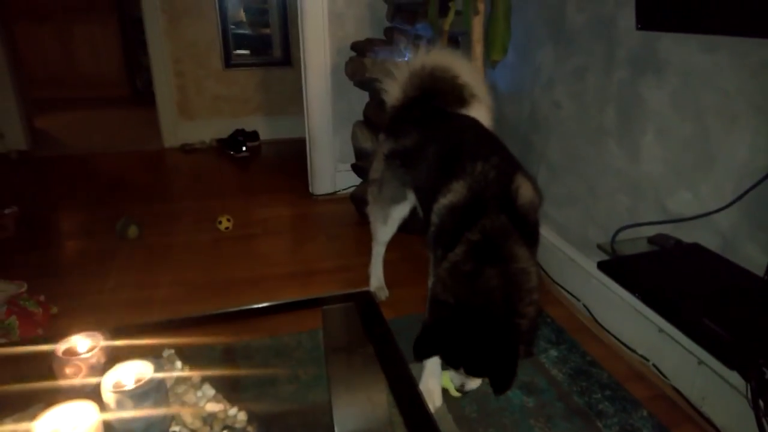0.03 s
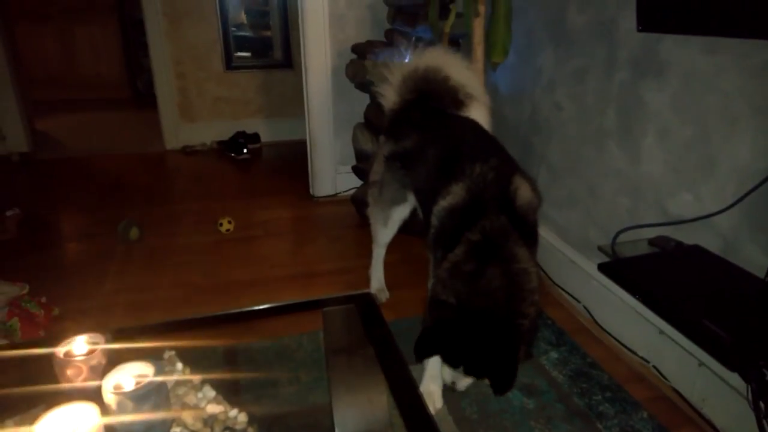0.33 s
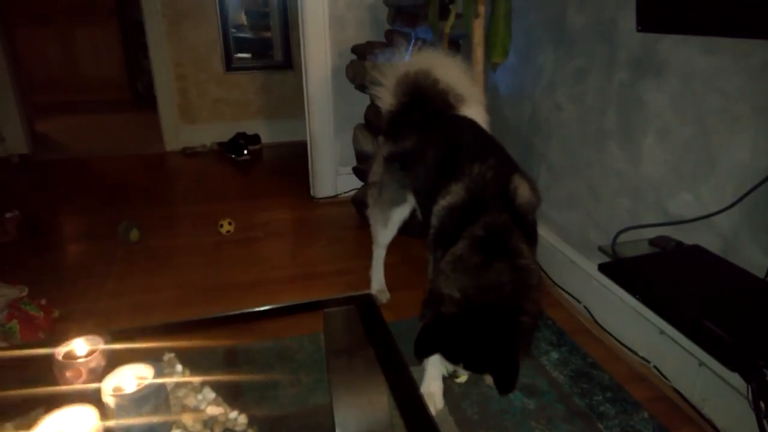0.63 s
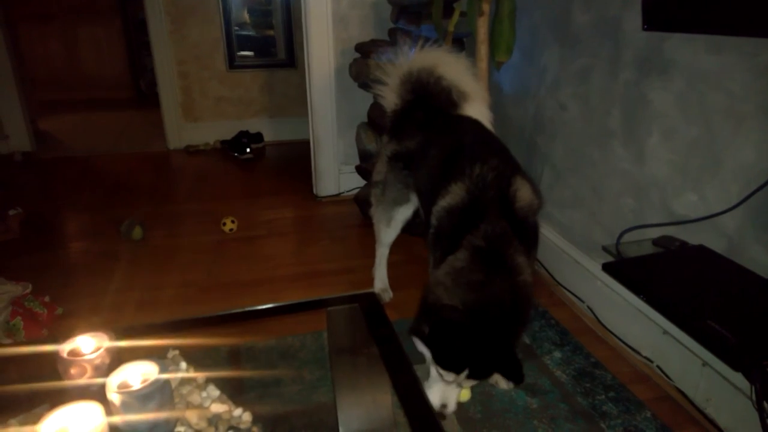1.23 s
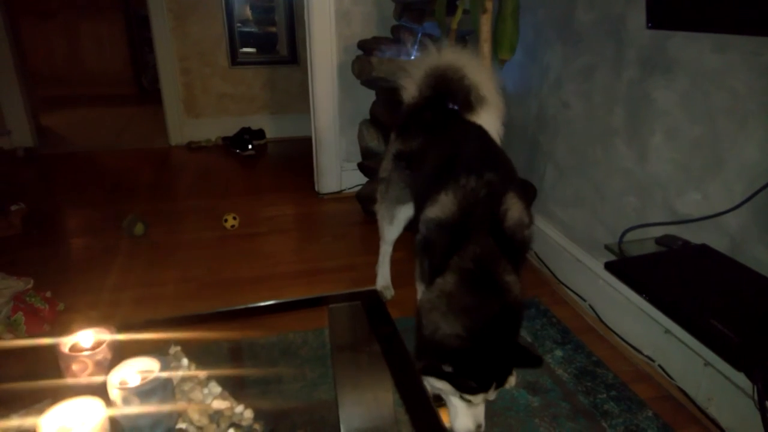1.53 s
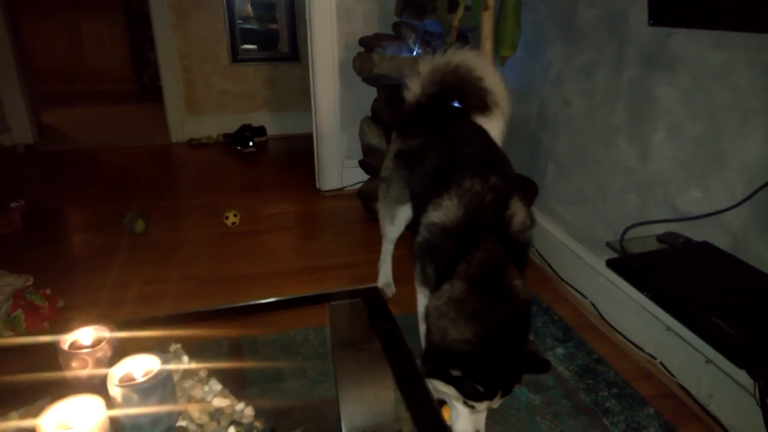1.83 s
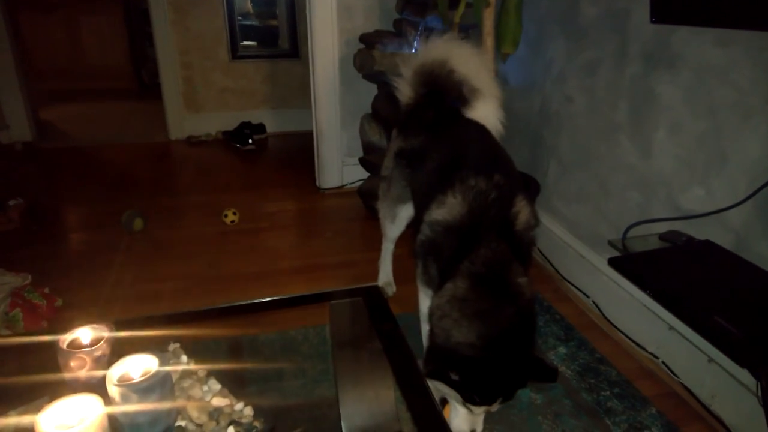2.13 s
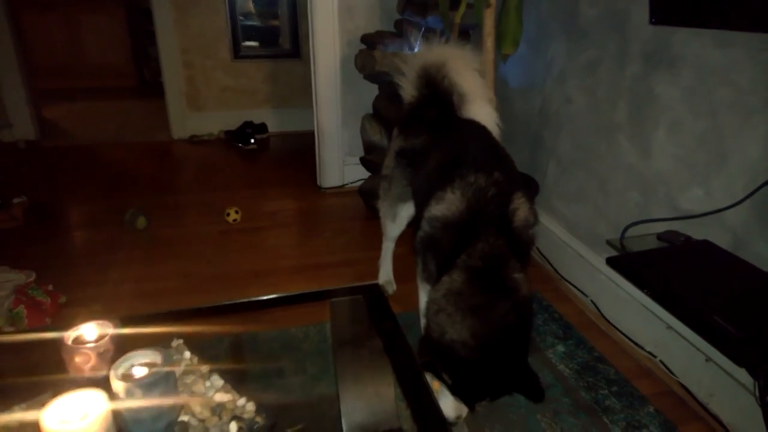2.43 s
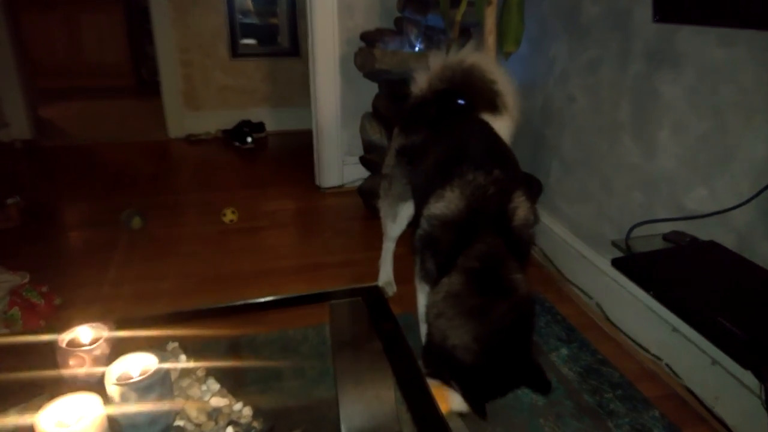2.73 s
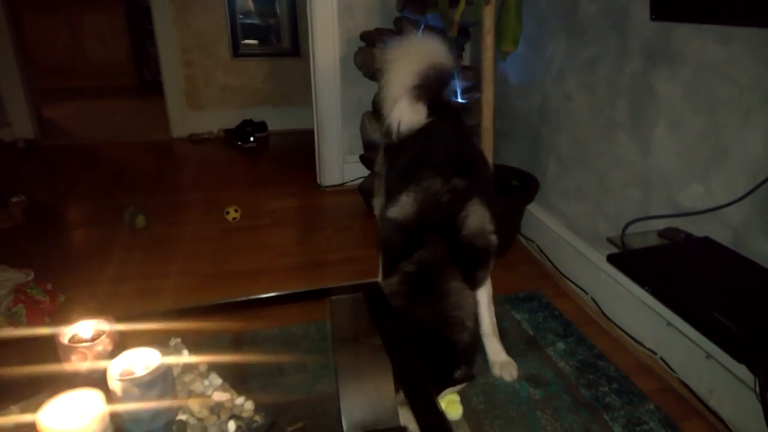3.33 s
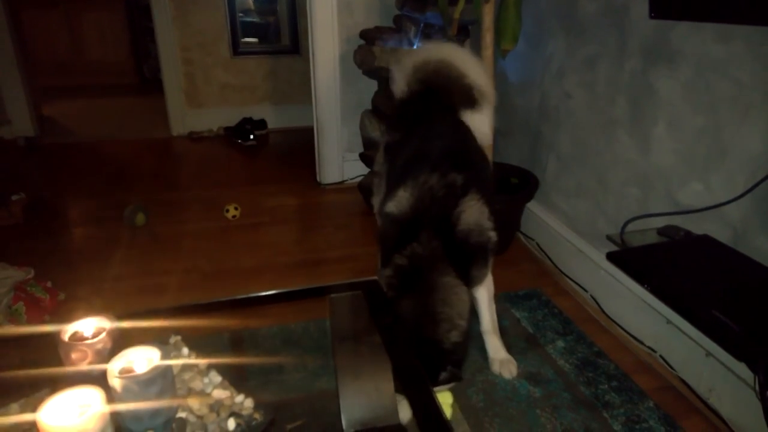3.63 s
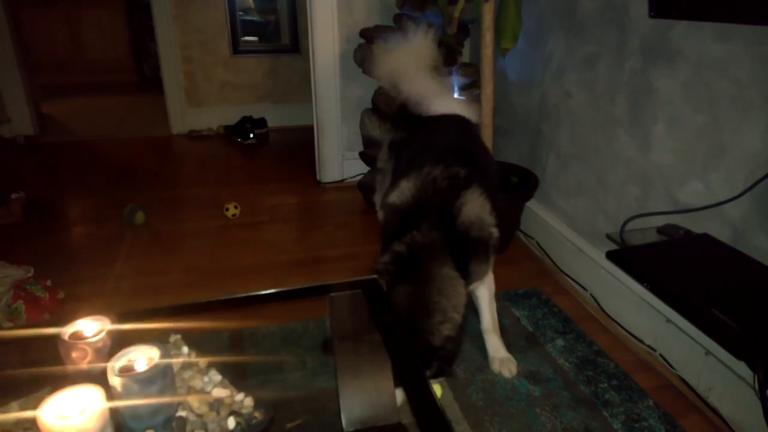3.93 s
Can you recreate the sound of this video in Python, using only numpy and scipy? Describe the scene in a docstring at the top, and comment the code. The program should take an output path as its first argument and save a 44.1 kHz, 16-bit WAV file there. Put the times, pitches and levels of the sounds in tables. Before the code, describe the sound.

A squeaky toy squeals up and down as a dog chews it in a quiet room. A quick run of squeaks gives way to fainter ones, with light ticks, rustling and dull bumps on the microphone.

```python
"""Dog with a squeaky toy

A quiet living room, heard from a camera's two microphones; the dog chews on a rug a little to the
right. Air through the toy's reed squeals up and down with each bite and rasps lower as the toy
refills; the room rings on. Mouth and paws rustle and tick, fingers bump the camera right beside
the microphones, and a soft hiss and hum lie underneath."""
import sys
import numpy as np
from scipy import signal
from scipy.fft import rfft, irfft, next_fast_len
from scipy.io import wavfile
from scipy.ndimage import uniform_filter1d, map_coordinates

SR = 44100
rng = np.random.default_rng(int(sys.argv[2]) if len(sys.argv) > 2 else 0)


def int16_out(signal):
    """Quantize to a 16-bit WAV file."""
    q = np.round(np.clip(np.atleast_2d(signal).T, -1, 1) * 32767)
    wavfile.write(sys.argv[1], SR, q.astype(np.int16))


N = 176400
T = np.arange(N) / SR


def amp(db):
    """Decibels to gain."""
    return 10 ** (np.asarray(db) / 20)


def unit(x):
    """Scale to rms 1."""
    return x / np.sqrt(np.mean(x ** 2) + 1e-20)


def along(points, hz):
    """Read (f/Hz, value) points on a log frequency axis."""
    f, v = np.transpose(points)
    return np.interp(np.log(hz + 1e-6), np.log(f), v)


def wobble(rate):
    """A smooth random curve, rate knots a second."""
    return map_coordinates(rng.standard_normal(8192), [T * rate], mode="wrap")


def filtered(x, response):
    """Filter x by a gain given as a function of frequency."""
    size = next_fast_len(N + SR // 2)
    return irfft(rfft(x, size) * response(np.fft.rfftfreq(size, 1 / SR)), size)[..., :N]


def noise(spectrum):
    """Noise of rms 1, coloured by (f/Hz, level/dB) points."""
    return unit(filtered(rng.standard_normal(N), lambda hz: amp(along(spectrum, hz))))


def swells(rows):
    """Bell-shaped envelopes from (peak t/s, half-width/s, level/dB) rows."""
    return sum(amp(db) * np.exp(-2 * ((T - peak) / width) ** 2) for peak, width, db in rows)


# likeness of diffuse sound at the two microphones: f/Hz, correlation
MIC_LIKENESS = [(30, 0.13), (200, 0.66), (500, 0.89), (1200, 0.35), (2200, 0.05), (5000, 0.051)]
def diffuse(pair):
    """Blend two unrelated signals into sound reaching the microphones from all sides."""
    turn = lambda hz: np.arccos(np.clip(along(MIC_LIKENESS, hz), -1, 1)) / 2
    mid, side = filtered(pair, lambda hz: np.array([np.cos(turn(hz)), np.sin(turn(hz))]))
    return np.array([mid + side, mid - side])


# hiss of the quiet room: f/Hz, level/dB
HISS_SPECTRUM = [(20, -25), (45, 9.5), (95, -1), (170, -2.5), (280, -6), (400, 4.5), (600, -8), (880, -8),
                 (1120, 2.5), (2500, -5.5), (4300, -4.5), (6500, -12), (11500, -23), (15000, -28.5)]
def room_tone(hiss_db=-45, hum_hz=118.2, hum_db=-59.5):
    """Steady hiss all around and a faint mains hum in the centre."""
    hiss = diffuse(np.array([noise(HISS_SPECTRUM), noise(HISS_SPECTRUM)]))
    hum = np.sqrt(2) * np.sin(2 * np.pi * hum_hz * T + 0.4 * wobble(3.5))
    return amp(hiss_db) * hiss + amp(hum_db) * hum


# contour of the rustling: t/s, level/dB
SCUFF_CONTOUR = [(0.0, -45), (0.11, -60.5), (0.62, -40), (0.66, -46), (0.99, -43.5), (1.26, -40.5),
                 (2.12, -50), (2.18, -38), (2.25, -51), (3.54, -42.5), (3.64, -55.5), (4.0, -41)]
# colour of the rug: f/Hz, level/dB
RUG_SPECTRUM = [(100, -3), (280, -6), (420, 3), (600, 2.5), (800, -2.5), (1200, -9.5), (1800, -28),
                (4000, -8), (15000, -34.5)]
def scuffs(trim_db=-2.5, flicker_db=3.2):
    """Mouth and paws rustle softly and unevenly on the rug."""
    level_db = np.interp(T, *np.transpose(SCUFF_CONTOUR)) + trim_db + flicker_db * wobble(45)
    return amp(level_db) * diffuse(np.array([noise(RUG_SPECTRUM), noise(RUG_SPECTRUM)]))


# path of the reed, one list per squeak: t/s, f/Hz, level/dB
SQUEAK_PATHS = [
    [(0, 2497, -18), (.032, 2760, -22), (.044, 3477, -24.5), (.06, 3492, -21), (.072, 3627, -16),
     (.076, 3565, -41), (.083, 3633, -22.5), (.0875, 3794, -13.5), (.09, 4380, -24)],
    [(.269, 3100, -39), (.274, 2440, -29.5), (.283, 1860, -35)],
    [(.297, 1784, -24.5), (.301, 2140, -23), (.306, 2703, -21.5), (.312, 3580, -28.5), (.321, 5300, -23.5),
     (.335, 5733, -30.5), (.398, 5650, -31), (.41, 4974, -16.5), (.417, 4737, -29), (.425, 4320, -30),
     (.429, 4090, -13.5), (.434, 3200, -26.5), (.441, 2510, -17.5), (.457, 2258, -17), (.461, 2010, -27),
     (.475, 1470, -38)],
    [(.524, 1656, -32), (.54, 1970, -18.5), (.554, 2416, -17), (.567, 2754, -23.5), (.578, 2980, -25)],
    [(.753, 2890, -39), (.759, 2056, -31.5), (.766, 1650, -26.5)],
    [(.786, 1764, -28), (.79, 1937, -19), (.795, 2620, -20.5), (.801, 3746, -33), (.807, 4906, -21),
     (.815, 5650, -21.5), (.83, 5950, -38), (.882, 5834, -39), (.888, 5567, -22), (.915, 4700, -20.5),
     (.92, 4510, -30), (.924, 4200, -18), (.932, 3850, -21.5), (.938, 3200, -32), (.953, 3396, -24.5),
     (.967, 2944, -30.5), (.979, 2534, -16.5), (.992, 2130, -20), (1, 1770, -31), (1.03, 966, -38)],
    [(1.088, 1008, -30), (1.102, 1180, -28.5), (1.115, 1373, -27.5), (1.135, 1472, -28.5),
     (1.155, 1346, -31), (1.183, 1046, -29.5), (1.2, 852, -37.5)],
    [(2.168, 1368, -38), (2.2, 1546, -31), (2.22, 1456, -30.5), (2.25, 1513, -30.5), (2.3, 1507, -30),
     (2.322, 1603, -31), (2.345, 1500, -30), (2.372, 1471, -34.5), (2.393, 1418, -26.5)],
    [(2.423, 1548, -36), (2.432, 2200, -28), (2.445, 4490, -32), (2.46, 5350, -32), (2.492, 5734, -30),
     (2.52, 5385, -37), (2.58, 5600, -39.5)],
    [(2.673, 1480, -33.5), (2.695, 1234, -36.5), (2.715, 1050, -38), (2.73, 893, -39)],
    [(3.635, 1296, -38.5), (3.652, 1425, -40.5), (3.715, 1154, -46)],
    [(3.792, 1360, -39.5), (3.87, 1554, -34.5), (3.895, 1765, -30.5), (3.938, 2043, -32.5),
     (3.972, 2108, -31), (3.986, 2630, -32.5), (4, 2790, -33)],
]
# mouth shaping, one row per squeak: fundamental/dB, upper ring/dB, treble/dB, air/dB, jitter/share
MOUTH_SHAPES = [(4, -2.5, -3, -11.5, .011), (-6, -8, -6, 3.5, 0.012), (4, -10, 6, -18, 0.0058),
                (-2.5, -2, -1, -12, .006), (1, -3, -6, 2.5, .015), (2, -16, -0.5, -9.5, 0.0038),
                (-10.5, -13, 4.5, -7, 0.0018), (-3, 8, 3, -15.5, 0.0036), (4.5, -8, 12, -15, 0.0046),
                (-3.5, -8, 3, -6.5, .005), (-2.5, -1, 1, -9, 0.0058), (0.5, 4, 11.5, -9.5, 0.0109)]
# where the mouth's upper ring acts: f/Hz, share
RING_BAND = [(5900, 0.15), (6600, 1), (8200, 0.68), (9500, 0.11)]
# where the mouth's treble change acts: f/Hz, share
TREBLE_BAND = [(8000, 0.03), (9800, 0.93)]
# overtones of the reed: multiple of the pitch, level/dB
REED_OVERTONES = [(1, 2), (2, 0), (3, -2.5), (4, -8.5), (6, -21.5), (12, -16)]
# colour of toy and muzzle: f/Hz, level/dB
TOY_COLOUR = [(800, 3.5), (1400, 4.5), (2400, 1.5), (3300, -0.5), (4500, 2.5), (5600, 5.5), (6500, -4),
              (8400, -10), (10800, -15.5), (13000, -29), (16000, -30)]
# air rushing past the reed: f/Hz, level/dB
AIR_SPECTRUM = [(1200, -6.5), (2200, 2.5), (2900, -8), (3600, 10.5), (5200, -2.5), (6800, -2), (10000, -11),
                (12500, -20.5), (15000, -26)]
def squeaker(edge_s=.002, rasp_s=(2.2, 2.32), rasp_db=-9.5):
    """The reed's harmonics sweep through the colour of toy and mouth, with a little rushing air."""
    fast_fall_hz_per_s, fall_boost_db, air_db_per_db = 23000, 4, 0.49
    out, rush = np.zeros(N), noise(AIR_SPECTRUM)
    shiver, waver, flutter_db = wobble(496.8), 0.00602 * wobble(70), 2 * wobble(120)
    multiples = np.arange(2, 27)[:, None] / 2
    for path, (base_db, ring_db, treble_db, air_db, jitter) in zip(SQUEAK_PATHS, MOUTH_SHAPES):
        mouth_db = lambda f: ring_db * along(RING_BAND, f) + treble_db * along(TREBLE_BAND, f)
        times, pitches, levels = np.transpose(path)
        on = (T > times[0] - edge_s) & (T < times[-1] + edge_s)
        t = T[on]
        glide_hz, level_db = np.interp(t, times, pitches), np.interp(t, times, levels)
        hz = glide_hz * (1 + jitter * shiver[on] + waver[on])
        partial_hz = multiples * hz
        colour_db = along(REED_OVERTONES, multiples) + along(TOY_COLOUR, partial_hz)
        colour_db += mouth_db(partial_hz)
        # a fast fall in pitch favours the fundamental over the overtones
        falling = np.clip(-np.gradient(glide_hz, t) / fast_fall_hz_per_s, 0, 1)
        colour_db[0] += base_db + fall_boost_db * falling
        # alternating strong and weak beats rasp: partials halfway between the harmonics
        rasp = amp(rasp_db) * np.clip(np.minimum(t - rasp_s[0], rasp_s[1] - t) / edge_s, 0, 1)
        gains = amp(colour_db) * (partial_hz < SR / 2) * np.where(multiples % 1, rasp, 1)
        phase = 2 * np.pi * np.cumsum(hz) / SR
        reed = (gains * np.sin(multiples * phase)).sum(0) / np.sqrt((gains ** 2).sum(0) / 2)
        air_colour = amp(air_db + mouth_db(np.fft.rfftfreq(len(t), 1 / SR)))
        air = irfft(rfft(rush[on]) * air_colour, len(t))
        air *= amp(air_db_per_db * (level_db - levels.mean()))  # louder is breathier
        gate = np.clip(np.minimum(t - times[0], times[-1] - t) / edge_s + 1, 0, 1)
        out[on] += gate * amp(level_db + flutter_db[on]) * (reed + air)
    return out


# fingers on the camera: t/s, hold/s, left level/dB, right level/dB
FINGER_BUMPS = [(.002, 0.014, -41, -15), (0.055, 0.043, -60, -18), (0.128, 0.05, -67, -25),
                (0.2, 0.022, -60, -18), (0.263, 0.025, -50, -20.5), (0.31, 0.077, -55, -30),
                (0.505, 0.0051, -22.5, -49), (0.552, 0.003, -44, -22), (0.612, 0.009, -42, -27),
                (0.629, 0.018, -37, -17), (0.676, 0.01, -32, -26.5), (0.699, 0.013, -55, -13.5),
                (0.823, 0.0096, -28, -13.5), (0.863, 0.024, -40, -23.5), (1.372, 0.007, -60, -32.5),
                (1.693, 0.014, -31, -54), (1.738, 0.078, -30.5, -50.5), (2.891, 0.074, -40, -55),
                (3.004, 0.014, -69, -30), (3.13, 0.018, -27, -28.5), (3.161, 0.036, -37, -30.5),
                (3.315, 0.055, -31, -36.5), (3.486, 0.011, -30, -50), (3.566, 0.062, -37.5, -40.5)]
# dull thump of the case: f/Hz, level/dB
CASE_SPECTRUM = [(20, -29), (50, -5), (100, 1.5), (170, -6.5), (260, -14.5), (450, -34), (2000, -90)]
# brighter part of a hard bump: f/Hz, level/dB
KNOCK_SPECTRUM = [(80, -13), (200, 0.5), (330, -5.5), (500, -25.5), (6000, -70)]
def bumps(rise_s=0.00364, t60_s=0.087, knock_db=0.5, knock_db_per_db=0.37):
    """Handling thumps through the case, different at each microphone; harder ones are brighter."""
    envelope = np.zeros((2, N))
    for start, hold, left_db, right_db in FINGER_BUMPS:
        on = (T > start - rise_s) & (T < start + hold + 2 * t60_s)
        t = T[on] - start
        rise = np.clip(1 + t / rise_s, 0, 1)
        decay = amp(-60 * np.maximum(t - hold, 0) / t60_s)
        envelope[:, on] += amp([[left_db], [right_db]]) * rise * decay
    hardness = amp(knock_db) * envelope ** knock_db_per_db
    shake = np.array([noise(CASE_SPECTRUM) + side * noise(KNOCK_SPECTRUM) for side in hardness])
    running_rms = np.sqrt(np.abs(uniform_filter1d(shake ** 2, size=900)) + 1e-6)
    return envelope * shake / running_rms


# side tones of the toy: start t/s, end t/s, f/Hz, level/dB
HOLLOW_TONES = [(0.308, .385, 3444, -36.5), (0.788, 0.85, 3490, -34.5), (2.465, 2.548, 10200, -49),
                (3.975, 4.01, 7200, -35.5)]
def whistles(pitch_spread=0.0205):
    """The toy's hollow whistles along fuzzily while the reed is overblown."""
    out = np.zeros(N)
    phase_per_hz = 2 * np.pi * np.cumsum(1 + pitch_spread * wobble(600)) / SR
    for start, end, hz, db in HOLLOW_TONES:
        on = (T > start) & (T < end)
        out[on] += amp(db) * np.sqrt(2) * np.sin(hz * phase_per_hz[on]) * signal.windows.tukey(on.sum())
    return out


# puffs from the nozzle: peak t/s, half-width/s, level/dB
JET_SWELLS = [(.435, .035, -55), (.965, .06, -49), (3.99, .07, -42)]
# their thin hiss: f/Hz, level/dB
JET_SPECTRUM = [(7000, -35), (10300, 6), (13000, -5)]
def jets():
    """Air is forced through the nozzle at the end of a hard squeeze."""
    return swells(JET_SWELLS) * noise(JET_SPECTRUM)


# strokes of fur: peak t/s, half-width/s, level/dB
FUR_SWELLS = [(1.42, 0.26, -58), (2.9, 0.27, -59.5), (3.35, .3, -70)]
# their bright rustle: f/Hz, level/dB
FUR_SPECTRUM = [(2500, -30), (7500, 13), (15000, -9)]
def fur(grain_db=6):
    """Fur brushes the toy and rug, faint and crisp, as the dog moves."""
    return swells(FUR_SWELLS) * unit(noise(FUR_SPECTRUM) * amp(grain_db * wobble(430)))


# contacts of teeth and claws: t/s, level/dB, ring f/Hz
CONTACTS = [(1.422, -43, 1190), (1.525, -38, 1120), (1.7, -41, 7400), (1.731, -35.5, 1170),
            (2.983, -44, 6900), (3.033, -32.5, 1140), (3.169, -38, 1090), (3.332, -37.5, 1160),
            (3.493, -41.5, 6500), (3.518, -37, 1140)]
def ticks(t60_s=0.038, octaves_per_khz=.1):
    """Each tooth or claw contact excites one brief resonance; brighter ticks are broader."""
    out, t = np.zeros(N + SR), np.arange(4096) / SR
    hz = np.fft.rfftfreq(len(t), 1 / SR) + 1
    fade = amp(-60 * t / t60_s)
    for start, db, ring_hz in CONTACTS:
        detuning = np.log2(hz / ring_hz) / (octaves_per_khz * ring_hz / 1000)
        ring = irfft(rfft(rng.standard_normal(len(t))) / (1 + detuning ** 2))
        out[round(start * SR):][:len(t)] += amp(db) * unit(ring * fade) * np.sqrt(np.mean(fade ** 2))
    return out[:N]


# slips of the toy: peak t/s, half-width/s, level/dB
RUB_SWELLS = [(1.512, 0.038, -46), (1.742, 0.05, -44.5), (1.93, 0.033, -47.5), (2.816, 0.044, -46),
              (3.328, 0.037, -50.5), (3.522, 0.11, -46)]
# colour of the friction: f/Hz, level/dB
RUB_SPECTRUM = [(250, 2), (480, 8), (800, 0.5), (1200, 6.5), (2000, -1), (4200, -21), (15000, -25)]
def rubs(grain_db=1.5):
    """The toy slides against teeth and fur in short, grainy swells."""
    return swells(RUB_SWELLS) * unit(noise(RUB_SPECTRUM) * amp(-grain_db * wobble(220)))


# ring of the living room: f/Hz, t60/s
ROOM_DECAY = [(200, 0.59), (1500, 0.41), (6000, 0.47), (12000, 0.43)]
# balance at the microphones: f/Hz, left minus right level/dB
MIC_BALANCE = [(1000, -9.5), (1500, -5.5), (2400, -3.5), (4400, -3), (8000, 1), (15000, 3)]
def room(x, direct_db=-3.5, tail_db=-3, echo_db=-18.5):
    """Direct sound from a little to the right, echoes off near surfaces and a diffuse tail."""
    build_s, echo_span_s, left_lag_s = 0.0031, .018, .00003
    hz, t, bands = signal.stft(rng.standard_normal((2, SR * 3 // 4)), SR, nperseg=256)
    decay = amp(-60 * t / along(ROOM_DECAY, hz)[:, None])
    tail = signal.istft(bands * decay * np.clip(t / build_s, 0, 1), SR, nperseg=256)[1]
    tail *= amp(tail_db) / np.linalg.norm(tail[0])
    for side in tail:
        echo_s = .001 + echo_span_s * rng.random(size=6)
        side[(SR * echo_s).astype(int)] += amp(echo_db) * rng.choice([-1, 1], size=6)
    reverb = diffuse(signal.fftconvolve(x[None], tail, axes=1)[:, :N])
    sides = np.array([[.5], [-.5]])
    direct = amp(direct_db) * filtered(x, lambda hz: np.exp(-2j * np.pi * hz * left_lag_s * sides))
    return filtered(direct + reverb, lambda hz: amp(along(MIC_BALANCE, hz) * sides))


def scene():
    """Dog and toy out in the room, handling right at the microphones, room tone underneath."""
    dog_and_toy = squeaker() + whistles() + jets() + ticks() + rubs() + fur()
    return room(dog_and_toy) + scuffs() + bumps() + room_tone()


def record(dry):
    """The camera keeps nothing above its band limit."""
    return filtered(dry, lambda hz: hz < 15700)


dry = scene()
out = record(dry)
int16_out(out)
```